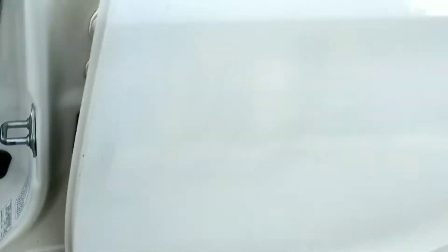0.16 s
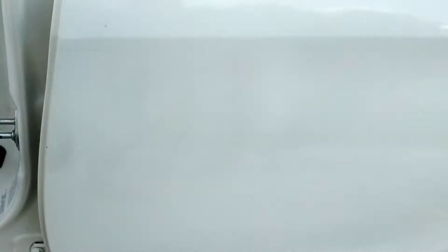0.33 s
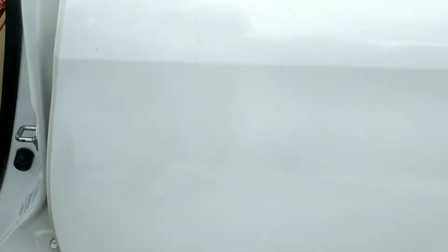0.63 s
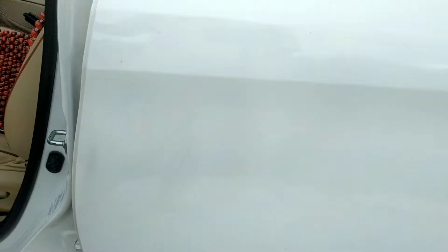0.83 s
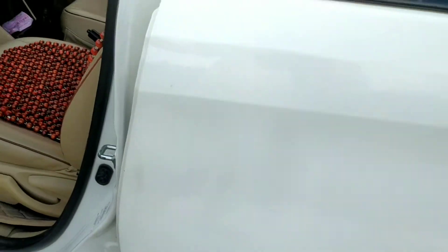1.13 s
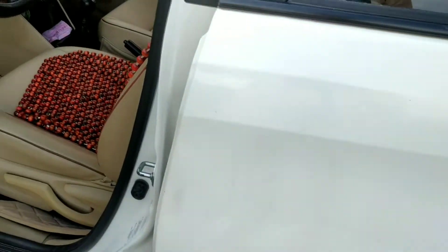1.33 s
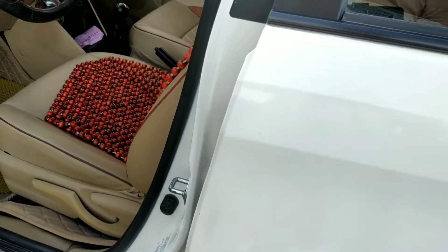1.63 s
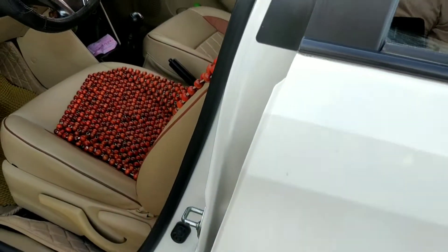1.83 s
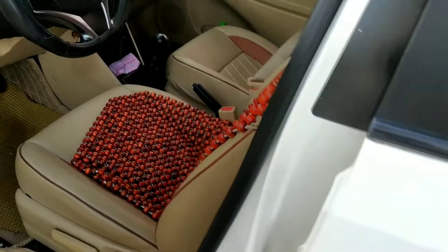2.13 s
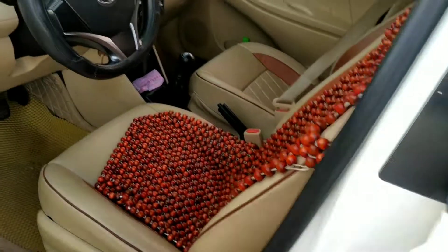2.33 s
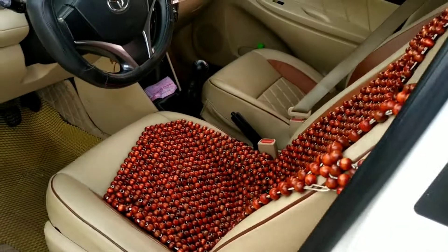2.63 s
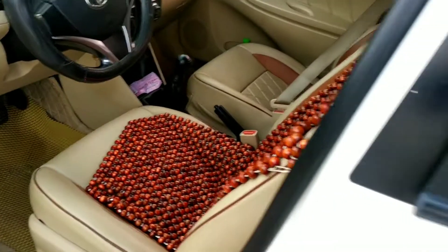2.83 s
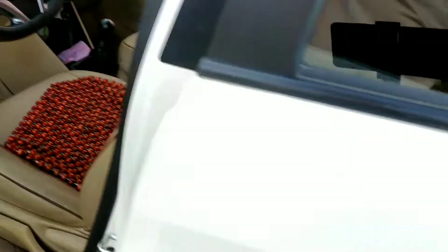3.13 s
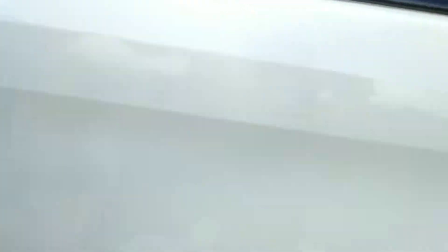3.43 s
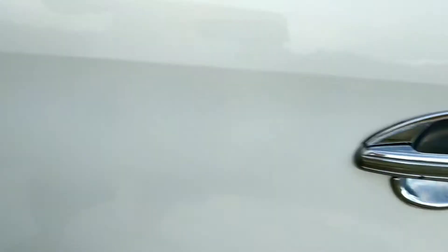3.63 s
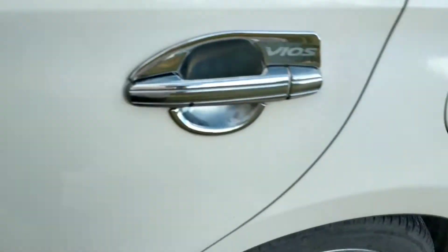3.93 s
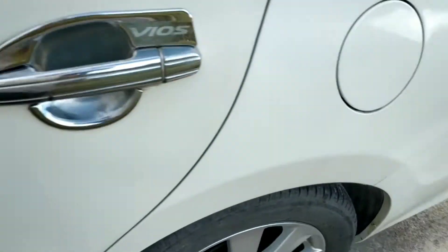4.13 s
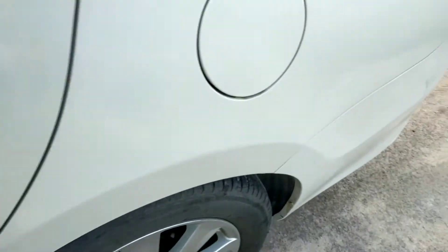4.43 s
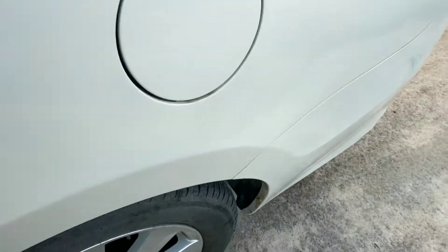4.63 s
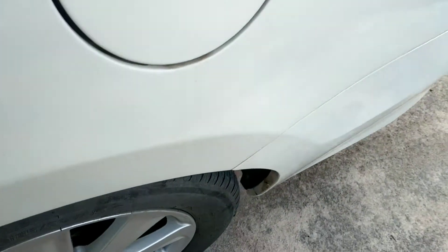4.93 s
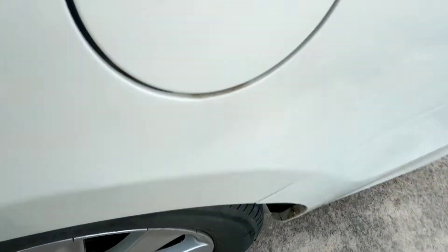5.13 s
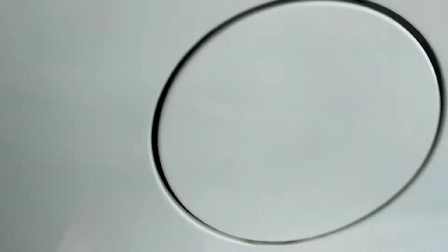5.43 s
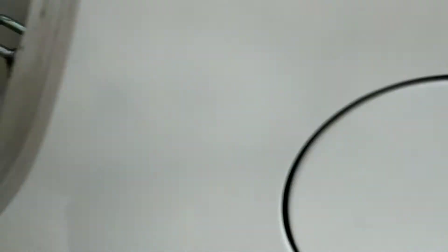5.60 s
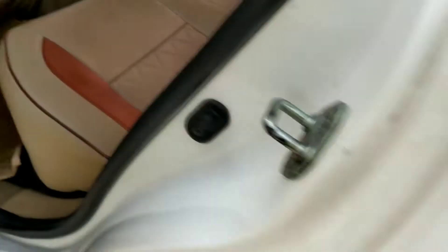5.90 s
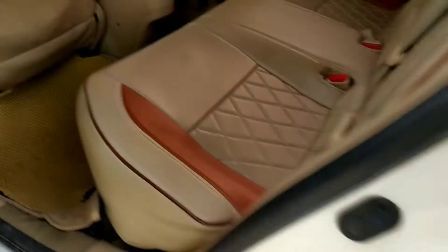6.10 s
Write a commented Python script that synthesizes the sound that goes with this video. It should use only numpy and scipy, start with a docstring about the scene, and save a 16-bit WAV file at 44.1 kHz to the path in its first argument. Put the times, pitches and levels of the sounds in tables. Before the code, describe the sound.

Outdoors beside an idling car, shoes scuff gritty ground, a door shuts with a boom, then its handle clunks and rattles and a finger thumps the microphone.

```python
"""A car idles outdoors while shoes scuff and squeak on gritty ground and a faint distant bird chirps; the
engine picks up under load and a fan joins in. A door is pushed shut: the latch claw chatters and the cabin
booms. Then a handle is pulled, a latch lets go with a clunk and a rattle, and a finger bumps the right microphone.
Engine and fan are sines over shaped noise; scuffs and slides are grainy noise, chirps narrow noise; blows are
short pressure pulses that drive the resonances of the door; clicks are noise bursts of metallic colour."""
import sys
import numpy as np
from scipy import signal
from scipy.fft import rfft, irfft, next_fast_len
from scipy.io import wavfile

SR = 44100
rng = np.random.default_rng(int(sys.argv[2]) if len(sys.argv) > 2 else 0)


def master(y):
    """Save y as 16-bit WAV."""
    cut = np.clip(np.atleast_2d(y).T, -1, 1)
    pcm = np.round(cut * 32767)  # scale
    wavfile.write(sys.argv[1], SR, pcm.astype(np.int16))


N = 276066
TIME = np.arange(N) / SR
LN_60_DB = np.log(1000)   # decay exponent over one t60
SHUT_S = 4.1415   # the door shuts
DOOR_LAG_S = 0.000464   # door sounds reach the left microphone later

# Blows on the door. Each row: moment in seconds, level in dB, hardness in Hz, share of strength kept by
# each rebound (0-1), ring of the struck spot in Hz, level of that ring against the blow in dB.
BLOWS = [(3.412, -42.5, 350, 0.63, 400, 5), (4.121, -26, 460, 0.35, 400, 1),
         (4.150, -17.5, 286, .16, 304, -9), (4.160, -21, 480, 0.2, 655, -5),
         (4.1745, -21.5, 300, .1, 427, 6), (4.1804, -16, 408, 0.25, 420, 0),
         (4.1985, -19.5, 79, 0, 105, -4), (4.214, -29, 640, .7, 770, 0), (4.4278, -22.5, 350, .05, 293, -4),
         (4.443, -38, 750, .7, 950, -10.5), (4.730, -27, 594, 0.24, 486, -3),
         (4.778, -28.5, 600, .6, 415, -11), (5.004, -17.5, 400, 0.2, 594, -8),
         (5.0063, -22, 107, 0, 135, -7), (5.0154, -9.5, 626, 0, 1120, -18),
         (5.045, -22.5, 430, 0.05, 330, -8), (5.0773, -24.5, 740, .85, 716, -10),
         (5.578, -26, 550, 0.85, 366, -4), (5.718, -35.5, 450, 0, 680, -6),
         (5.742, -32.5, 160, 0.3, 150, -6)]


def amp(db):
    """Decibels to gain."""
    return 10 ** (np.asarray(db) / 20)


def rms_one(x):
    """Scale to rms 1."""
    return x / np.sqrt(np.mean(x ** 2) + 1e-20)


def in_time(rows):
    """Each column of a curve at every sample."""
    s, *columns = np.transpose(rows)
    return [np.interp(TIME, s, c) for c in columns]


def swell(s, rise_s, fall_s):
    """Envelope that grows exponentially to 1 at a moment and dies away."""
    return np.exp(-np.maximum((s - TIME) / rise_s, (TIME - s) / fall_s).clip(0, 20))


def bell(s, half_length_s):
    """Rounded envelope around a moment."""
    return np.exp(-np.minimum(((TIME - s) / half_length_s) ** 2, 20))


def cut(x, hz, kind="low", order=2):
    """Butterworth low- or high-pass."""
    sos = signal.butter(order, hz, kind, fs=SR, output="sos")
    return signal.sosfilt(sos, x + 1e-18)


def resonate(x, hz, width_hz):
    """One two-pole resonance, gain about 1 on top."""
    r = np.exp(-np.pi * width_hz / SR)
    feed = [(1 - r * r) / 2, 0, (r * r - 1) / 2]
    feedback = [1, -2 * r * np.cos(2 * np.pi * hz / SR), r * r]
    return signal.lfilter(feed, feedback, x + 1e-18)


def narrow_noise(shape, hz, width_hz):
    """Noise through the same resonance twice: a wavering pitch or a focused hiss; rms 1."""
    once = resonate(rng.standard_normal(shape), hz, width_hz)
    return rms_one(resonate(once, hz, width_hz))


def add(out, s, sound):
    """Mix a sound in at a time."""
    start = int(round(s * SR))
    out[..., start:start + sound.shape[-1]] += sound[..., :N - start]


def drift(rate):
    """Random wander with a given number of turning points per second; rms 1."""
    knots = rng.standard_normal(int(N / SR * rate) + 2)
    return rms_one(np.interp(TIME * rate, np.arange(len(knots)), knots))


def noise(colour, alike, size=N, peaks=()):
    """Stereo noise with a given spectrum, resonances and left-right likeness (0-1); rms 1."""
    length = next_fast_len(size)
    hz = np.arange(length // 2 + 1) * SR / length + 1e-3
    points, db = np.transpose(colour)
    bumps_db = sum(height / (1 + (2 * (hz - centre) / width) ** 2) for centre, width, height in peaks)
    bass_fade = np.minimum(hz / points[0], 1) ** 2
    gain = amp(np.interp(np.log(hz), np.log(points), db) + bumps_db) * bass_fade
    mid, side = irfft(rfft(rng.standard_normal((2, length))) * gain, length)[:, :size]
    return rms_one(np.sqrt(1 + alike) * mid + np.sqrt(1 - alike) * side * [[1], [-1]])


def place(x, pan_db, lag_s=0):
    """Set left minus right level between the microphones; the left one hears it later."""
    left = np.pad(x[0], (round(lag_s * SR), 0))[:N]
    return np.array([left, x[1]]) * amp([[pan_db / 2], [-pan_db / 2]])


def grains(per_s, spread_db, ring_s, smooth):
    """Envelope of tiny slips of uneven size, each dying quickly, over smooth friction."""
    size_db = spread_db * np.minimum(rng.exponential(1, N), 4)
    slips = (rng.random(N) < per_s / SR) * amp(size_db) ** 2
    power = signal.lfilter([1], [1, -np.exp(-1 / (ring_s * SR))], slips + 1e-18)
    return rms_one(np.sqrt(power / power.mean() + smooth))


def grainy(x, per_s, spread_db, ring_s, smooth):
    """Each octave of a friction noise crackles with slips of its own."""
    out = 0
    for hz in (2000, 4000, 8000):
        band = cut(x, hz, order=1)
        out = out + band * grains(per_s, spread_db, ring_s, smooth)
        x = x - band
    return rms_one(out + x * grains(per_s, spread_db, ring_s, smooth))


def engine(waver_db=1.5, fan_wander=0.42, fan_flutter_db=2.5):
    """Firing throb, hissy ticking and broad wash; the fan hum comes in with the load."""
    # Idle curve. Each row: time in seconds, firings per second, level in dB.
    idle_curve = [(0, 18.8, -44), (1.45, 20.6, -45), (1.9, 24.9, -45.5), (6.26, 25.3, -46)]
    # Harmonics of the throb. Each row: multiple of the firing rate, level in dB.
    orders = [(1, -2.5), (2, -5), (4, -14.5)]
    # Fan and compressor hum. Each row: pitch in Hz, level in dB at full load.
    fan_tones = [(150.7, -54), (178, -61), (202, -62), (226, -60), (249, -54.5), (274, -58.5), (566, -71.5),
                 (608, -74.5), (932, -75.5), (1254, -76), (1400, -77), (1800, -78)]
    # Outdoor air and engine before the load. Each row: frequency in Hz, level in dB per Hz.
    air_colour = [(50, -16.5), (108, -7), (187, -11.5), (256, -13.5), (317, -11.5), (480, -24), (565, -17),
                  (850, -31.5), (1500, -30), (2200, -32.5), (6000, -36), (15500, -39)]
    # Engine wash under load. Each row: frequency in Hz, level in dB per Hz.
    wash_colour = [(50, 4.5), (119, -6.5), (200, -20.5), (270, -9), (330, -16), (455, -16), (640, -20),
                   (900, -26), (1200, -29), (1830, -28), (2620, -32), (3420, -31.5), (7000, -36.5),
                   (15500, -38)]
    # Resonances in both washes. Each row: centre in Hz, width in Hz, height above the rest in dB.
    wash_resonances = [(767, 18, 7), (940, 58, 7), (1065, 26, 5), (1243, 160, 6.5), (1880, 370, 4),
                       (3180, 97, 3), (3570, 450, 4)]
    load_on_s, load_rise_s = 1.42, 0.6
    air_db, wash_db = -50.5, -46
    tick_db, tick_hz, tick_width_hz, tick_fade_db = -66.5, 6250, 680, 4

    firings_per_s, level_db = in_time(idle_curve)
    firing_phase = 2 * np.pi * np.cumsum(firings_per_s) / SR
    throb = sum(amp(level_db + db + waver_db * drift(9.4)) * np.sin(k * firing_phase) for k, db in orders)
    fan = 0
    for hz, db in fan_tones:
        wander = fan_wander * np.pi * drift(13)
        fan = fan + amp(db + fan_flutter_db * drift(13)) * np.sin(2 * np.pi * hz * TIME + wander)

    load = np.clip((TIME - load_on_s) / load_rise_s, 0, 1)
    idle_wash = amp(air_db) * noise(air_colour, alike=0.5, peaks=wash_resonances)
    loaded_wash = amp(wash_db) * noise(wash_colour, alike=0.24, peaks=wash_resonances)
    wash = np.sqrt(1 - load) * idle_wash + np.sqrt(load) * loaded_wash

    # one tick per crank turn, which is every second firing; fainter under load
    beat = np.sin(firing_phase / 4 + np.pi / 5) ** 4
    hiss = narrow_noise((2, N), tick_hz, tick_width_hz)
    ticking = amp(tick_db - tick_fade_db * load) * beat * hiss
    hum = np.sqrt(2) * (throb + load * fan)   # sines given as rms
    return place([hum, hum], pan_db=1.5) + ticking + wash


def shoes():
    """A sole drags over grit: each scuff swells and fades, crackling with grains."""
    # Scuffs. Each row: moment of the height in seconds, level in dB, rise in seconds, fall in seconds,
    # brightness (low-pass) in Hz.
    scuffs = [(.14, -54.5, 0.14, 0.22, 14100), (.42, -54.5, 0.077, 0.13, 4000),
              (.93, -53, 0.045, 0.05, 5000), (1.10, -51.5, 0.05, 0.039, 9100),
              (1.648, -37, 0.014, 0.046, 9000), (1.674, -41, .008, .008, 3500),
              (1.692, -39.5, .012, 0.01, 6000), (2.241, -39.5, 0.015, 0.12, 19100),
              (2.40, -57, 0.041, 0.072, 9000), (3.04, -52, 0.056, 0.065, 7000),
              (3.39, -55, 0.34, 0.32, 9000), (4.63, -48, 0.11, 0.084, 12300),
              (5.42, -52.5, 0.097, 0.11, 12000), (6.23, -47.5, 0.07, 0.14, 7240)]
    # Spectrum of the grit. Each row: frequency in Hz, level in dB per Hz.
    grit_colour = [(300, -6.5), (750, -9), (1300, -4.5), (2100, -4.5), (3200, -0.5), (5000, -3.5),
                   (9000, -4), (15500, -6)]
    # Resonances of sole and grit. Each row: centre in Hz, width in Hz, height above the rest in dB.
    grit_resonances = [(1090, 85, 5), (1790, 78, 4), (2274, 59, 4), (3050, 76, -2)]
    drag = noise(grit_colour, alike=0.057, peaks=grit_resonances)
    grit = grainy(drag, per_s=900, spread_db=4.2, ring_s=.0014, smooth=.15)
    out = 0
    for s, db, rise_s, fall_s, bright_hz in scuffs:
        out = out + amp(db) * swell(s, rise_s, fall_s) * cut(grit, bright_hz, order=1)
    return out


def chirps(width_hz=350):
    """Brief chirps, each at one pitch: shoe squeaks, and faint distant bird notes near 0.93 and 3.99 s."""
    # Squeaks and bird notes. Each row: moment in seconds, level in dB, pitch in Hz, half length in seconds.
    chirp_rows = [(.93, -63, 4000, .025), (1.505, -61, 3400, .008), (1.588, -62, 2650, 0.0069),
                  (1.61, -58, 2600, 0.0082), (1.67, -45, 1900, 0.0073), (2.272, -50, 3050, .005),
                  (2.451, -56, 3430, 0.0069), (2.484, -54, 3450, .004), (3.06, -63, 1790, .02),
                  (3.99, -65, 3500, .03)]
    out = 0
    for s, db, hz, half_length_s in chirp_rows:
        out = out + amp(db) * narrow_noise(N, hz, width_hz) * bell(s, half_length_s)
    return out


def click(bright_hz, t60, ring_hz, crack=0.6, crack_s=0.0005, attack_s=0.00023):
    """A small metal or plastic contact: a crack, then a short dense ring that favours one pitch."""
    # Spectrum of the contacts. Each row: frequency in Hz, level in dB per Hz.
    steel_colour = [(200, 13), (700, -1), (1200, 3.5), (2000, -4.5), (2900, 0.5), (3600, -4.5),
                    (5000, -1.5), (7000, 2), (10000, -1), (15500, 8.5)]
    # Latch resonances. Each row: centre in Hz, width in Hz, height above the rest in dB.
    latch_resonances = [(1460, 350, 4), (1820, 91, 5), (2060, 170, 9.5), (2250, 25, 13), (2440, 77, 6),
                        (3400, 40, 11.5), (3940, 150, 4.5), (4300, 46, 1), (6350, 490, -1.5)]
    ring_db, ring_width_share = 8, 0.21   # width as a share of the pitch
    t = TIME[:SR // 5]
    decay = np.exp(-LN_60_DB * t / t60) + crack * np.exp(-t / crack_s)
    attack = 1 - np.exp(-t / attack_s)
    peaks = [*latch_resonances, (ring_hz, ring_width_share * ring_hz, ring_db)]
    contact = noise(steel_colour, alike=0.15, size=len(t), peaks=peaks) * decay * attack
    return cut(contact, bright_hz, order=3)


def clicks(count=4):
    """Single clicks, and the latch claw chattering over the striker, each contact weaker and duller."""
    # Clicks of latch, handle and grit. Each row: moment in seconds, level in dB, brightness (low-pass)
    # in Hz, t60 in seconds, ring in Hz.
    contacts = [(1.083, -36, 10600, 0.034, 3280), (1.623, -35, 4000, .03, 1280),
                (1.6409, -27, 8050, 0.042, 2020), (1.649, -33, 9000, .04, 5200),
                (1.6889, -27.5, 8000, 0.04, 2200), (1.695, -36, 8500, 0.029, 4500),
                (1.721, -41, 9000, .04, 4700), (1.734, -34.5, 8000, 0.033, 1500),
                (2.243, -28.5, 15600, 0.033, 11100), (2.271, -33, 12000, 0.032, 3050),
                (2.308, -38.5, 13000, 0.11, 7000), (2.480, -33.5, 13000, 0.068, 3400),
                (3.369, -40, 10300, .06, 5040), (3.409, -40, 11100, .06, 3520),
                (4.1173, -23.5, 4440, 0.052, 2700), (4.181, -28.5, 14000, .02, 8200),
                (4.4255, -32.5, 10700, 0.029, 5940), (4.5025, -27, 4200, .018, 1410),
                (4.5605, -28, 5000, 0.018, 2000), (4.730, -20.5, 3300, .016, 2330),
                (4.7578, -29, 9300, 0.011, 5270), (4.770, -36, 9000, .025, 6500),
                (4.911, -29, 11000, 0.021, 4200), (4.96, -35, 11100, .04, 4240),
                (5.0145, -14.5, 5970, 0.028, 1420), (5.027, -24, 10000, 0.033, 5900),
                (5.044, -23.5, 4500, 0.018, 2210), (5.0762, -15, 5500, .026, 2270),
                (5.082, -22.5, 7500, .018, 2100), (5.088, -15, 4000, 0.032, 2240),
                (5.1532, -26.5, 6000, 0.027, 2000), (5.2008, -25, 4440, .025, 1750),
                (5.215, -29, 4900, .025, 1500), (5.270, -39, 9970, .02, 6450),
                (5.383, -27, 5600, 0.019, 1920), (5.537, -34, 10100, 0.068, 7300),
                (5.578, -34, 4000, 0.054, 2620), (6.117, -34, 6470, 0.037, 1700),
                (6.192, -35, 8950, .03, 4000), (6.243, -37, 6000, .05, 1700)]
    claw_db, claw_hz, claw_t60_s, claw_ring_hz = -23.5, 12500, 0.12, 2300
    claw_gap_s, claw_loss_db, claw_dulling = .0095, 0.6, 0.74   # brightness factor per contact
    out = np.zeros((2, N))
    for s, db, bright_hz, t60, ring_hz in contacts:
        add(out, s, amp(db) * click(bright_hz, t60, ring_hz))
    for k in range(count):
        contact = click(claw_hz * claw_dulling ** k, claw_t60_s, claw_ring_hz)
        add(out, SHUT_S + k * claw_gap_s, amp(claw_db - k * claw_loss_db) * contact)
    return out


def wind():
    """Low, lumpy air movement on the microphone ports, in puffs that lean to either side."""
    # Puffs. Each row: moment of the height in seconds, level in dB, left minus right in dB.
    puffs = [(2.04, -38.5, -11), (2.6, -45, -10.5), (3.22, -46.5, -17), (3.47, -47, -6), (4.5, -41, -5),
             (5.33, -35.5, -5), (5.7, -34, 0.5), (6.18, -39.5, 2)]
    # Spectrum of the rumble. Each row: frequency in Hz, level in dB per Hz.
    rumble_colour = [(15, 4), (28, -2.5), (70, -6.5), (130, -10.5), (300, -23.5), (900, -69)]
    rumble = noise(rumble_colour, alike=0.67)
    return sum(place(amp(db) * bell(s, half_length_s=0.18) * rumble, pan_db) for s, db, pan_db in puffs)


def whine():
    """A faint wavering whine, narrow noise, swells for a while beside the open cabin."""
    tone = narrow_noise((2, N), hz=937, width_hz=68)
    return amp(-62) * bell(3.33, half_length_s=.4) * tone


def rebounds(blows, count=3):
    """Each blow strikes again at uneven gaps, keeping a share of its strength every time."""
    gap_s, scatter = 0.007015, 0.307   # typical gap; share by which it varies
    contacts = []
    for s, db, hard_hz, share, *_ in blows:
        change_db = 20 * np.log10(np.clip(share, .01, 1))
        for k, chance in enumerate(rng.uniform(-0.91, 1, count)):
            contacts.append((s, db + k * change_db, hard_hz))
            s += gap_s * (1 + scatter * chance)
    return contacts


def pushes(contacts):
    """Each cushioned contact gives one smooth push and pull of pressure, shorter when harder."""
    out, t = np.zeros(N), TIME[:SR // 20]
    middle = t.mean()
    for s, db, hard_hz in contacts:
        age = 2 * np.pi * hard_hz * (t - middle)
        # slope of a bell curve, scaled to peak at 1
        pulse = -age * np.exp(.5 - np.minimum(age ** 2 / 2, 60))
        add(out, s - middle, amp(db) * pulse)
    return out


def struck_spots(t60=0.036, attack_s=0.001):
    """Around the point of each blow the door skin rings briefly at a pitch of its own."""
    out, t = np.zeros(N), TIME[:SR // 5]
    fade = np.exp(-LN_60_DB * t / t60) * (1 - np.exp(-t / attack_s))
    for s, db, _, _, ring_hz, ring_db in BLOWS:
        add(out, s, -amp(db + ring_db) * fade * np.sin(2 * np.pi * ring_hz * t))
    return out


def door(direct_db=-1, panel_db=-1, body_db=-0.5, body_t60=0.22):
    """Contacts sound directly and drive the door skin and the dense modes of the body."""
    # Modes of the door skin. Each row: pitch in Hz, level in dB, t60 in seconds.
    skin_modes = [(83.4, 5.5, 0.5), (105, 2, 0.065), (164, 2.5, 0.032), (219, 5, 0.41), (313, 1.5, 0.043),
                  (380, -1, 0.099), (405.4, -3, 0.44), (436, 3, 0.2), (548, -7, .2), (642, 0, .3),
                  (716, -7, 0.26), (775, 3, 0.13), (809, 3, 0.16), (895, 2, 0.16)]
    # Spectrum of the dense body modes. Each row: frequency in Hz, level in dB per Hz.
    body_colour = [(50, -20), (130, 8.5), (400, 6.5), (800, -0.5), (1200, 0.5), (2000, 20), (5000, -21),
                   (15000, -4)]
    force, t = pushes(rebounds(BLOWS)), TIME[:SR // 3]
    skin = sum(amp(db) * resonate(force, hz, LN_60_DB / (np.pi * t60)) for hz, db, t60 in skin_modes)
    tail = noise(body_colour, alike=0.97, size=len(t)) * np.exp(-LN_60_DB * t / body_t60)
    # the body has unit gain in the low mids
    tail /= np.sqrt(np.mean(np.abs(rfft(tail)[:, 30:300]) ** 2))
    body = signal.fftconvolve(force[None], tail, axes=1)[:, :N]
    return amp(direct_db) * force + struck_spots() + amp(panel_db) * skin + amp(body_db) * body


def cabin():
    """The shutting door squeezes the cabin air, which swings slowly just after."""
    # Swings of the cabin air. Each row: pitch in Hz, level in dB, t60 in seconds.
    swings = [(28.2, -12.5, 0.68), (49.9, -26.5, 0.96), (84.7, -20, 0.32)]
    delay_s = 0.005
    out = np.zeros((2, N))
    for hz, db, t60 in swings:
        swing = np.sin(2 * np.pi * hz * TIME) * np.exp(-LN_60_DB * TIME / t60)
        add(out, SHUT_S + delay_s, amp(db) * swing)
    return out


def stroke(start, length):
    """Effort of one slide: a quick attack, an easing hold, a quick release."""
    attack_s, release_s, fade_db = 0.012, 0.008, 7.5
    age = TIME - start
    attack = np.clip(age / attack_s, 0, 1)
    hold = amp(-fade_db * np.clip(age / length, 0, 1))
    release = np.exp(-np.clip((age - length) / release_s, 0, 20))
    return attack * hold * release


def linkage(friction_db=-2.3, ring_db=-8.0):
    """Handle and rods slide in quick uneven slips; each resonance is rung by slips of its own."""
    # Slides of handle and linkage. Each row: start in seconds, length in seconds, level in dB.
    slides = [(4.218, 0.083, -41.5), (4.473, 0.11, -49), (4.757, 0.058, -42), (4.963, 0.077, -45),
              (5.009, 0.056, -28), (5.074, 0.028, -28), (5.097, .118, -31.8), (5.207, 0.26, -51.5),
              (5.499, 0.059, -39), (5.567, 0.026, -43)]
    # Spectrum of the rasp. Each row: frequency in Hz, level in dB per Hz.
    rasp_colour = [(150, 33), (400, 13), (750, -30), (1150, 12), (1550, 6), (1950, -17), (2300, -26),
                   (2900, 11), (4650, 6.5), (7200, 5), (10000, 2), (15500, -3)]
    # Linkage resonances. Each row: centre in Hz, width in Hz, level in dB.
    rod_resonances = [(1470, 300, 2.5), (1810, 210, 3), (1960, 99, -20), (2241, 9.8, 7.5), (2560, 140, 1),
                      (2740, 120, -2.5), (3530, 140, -5), (4660, 90, -7), (5050, 740, -9.5)]
    rasp = noise(rasp_colour, alike=0.19)
    friction = grainy(rasp, per_s=850, spread_db=2.8, ring_s=.0011, smooth=.25)
    ringing = 0
    for hz, width_hz, db in rod_resonances:
        slips = grains(per_s=220, spread_db=2.7, ring_s=.0006, smooth=.03)
        ringing = ringing + amp(db) * resonate(slips * rng.standard_normal(N), hz, width_hz)
    effort = sum(amp(db) * stroke(start, length) for start, length, db in slides)
    return effort * (amp(friction_db) * friction + amp(ring_db) * rms_one(ringing))


def finger(leak_db=-19, leak_hz=300, vent_hz=75, case_hz=345, case_width_hz=45, case_db=-2):
    """Each bump squeezes air into the right port, where it vents and rings the casing; the skin rubs once."""
    # Bumps of the finger. Each row: moment in seconds, level in dB, hardness in Hz.
    bump_rows = [(5.45, -11.5, 133), (5.4799, -11, 195), (5.5036, -6, 140), (5.511, -6, 674),
                 (5.5172, -2, 181), (5.5192, 0.5, 710), (5.564, -13.5, 130)]
    # Spectrum of the rubbing skin. Each row: frequency in Hz, level in dB per Hz.
    skin_colour = [(60, 12.5), (300, 10.5), (800, -9), (1400, -35), (3000, -29), (8000, -43)]
    squeeze = sum(amp(db) * bell(s, np.sqrt(2) / (2 * np.pi * hard_hz)) for s, db, hard_hz in bump_rows)
    rub = amp(-18) * swell(5.521, rise_s=0.026, fall_s=0.026) * noise(skin_colour, alike=0.48)[0]
    vented = cut(squeeze, vent_hz, "high", order=1)
    casing = amp(case_db) * resonate(squeeze, case_hz, case_width_hz)
    right = vented + casing + rub
    left = amp(leak_db) * cut(right, leak_hz)   # a dull leak to the other port
    return np.array([left, right])


def scene():
    """The door leans right and reaches the right microphone first; the other sources join it."""
    around = shoes() + chirps() + whine() + place(engine(), pan_db=-1.1, lag_s=.00038)
    car_door = place(door() + clicks(), pan_db=-3.5, lag_s=DOOR_LAG_S)
    handle = place(linkage(), pan_db=-1.5, lag_s=DOOR_LAG_S)
    boom = place(cabin(), pan_db=0.0, lag_s=0.00042)
    return around + car_door + handle + boom + wind() + finger()


def record(dry):
    """Each port adds its own colour; the highest peaks are rounded and the top is cut steeply."""
    # Difference between the two ports. Each row: frequency in Hz, left minus right in dB.
    port_balance = [(60, -2), (380, 0), (700, -2.5), (1300, -0.8), (2400, 0), (4400, -4.5), (8100, -4),
                    (11000, 3), (14500, 4.5)]
    overload, cutoff_hz = .9, 15750   # overload as a share of full scale
    hz = np.linspace(1, SR / 2, N // 2 + 1)
    points, db = np.transpose(port_balance)
    balance_db = np.interp(np.log(hz), np.log(points), db)
    heard = irfft(rfft(dry) * amp([balance_db / 2, -balance_db / 2]), N)
    heard = heard / (1 + (heard / overload) ** 4) ** (1 / 4)
    return signal.sosfilt(signal.ellip(10, .1, 90, cutoff_hz, fs=SR, output="sos"), heard)


dry = scene()
out = record(dry)
master(out)
```